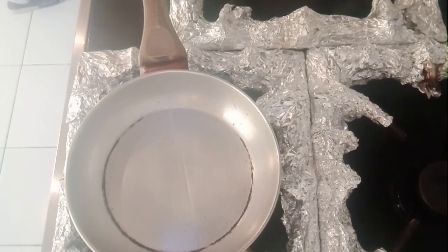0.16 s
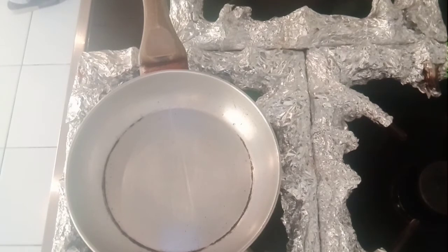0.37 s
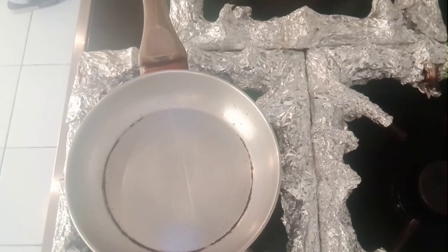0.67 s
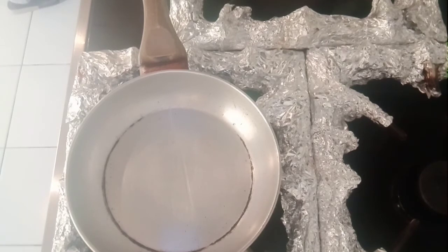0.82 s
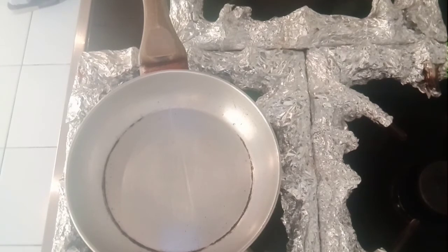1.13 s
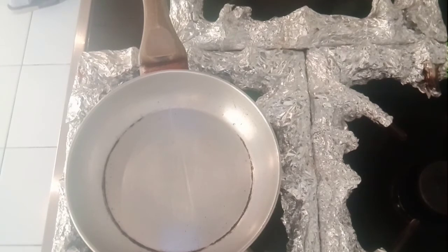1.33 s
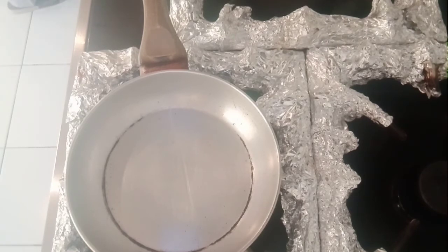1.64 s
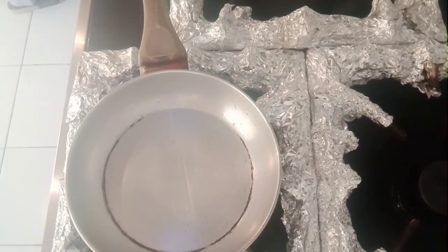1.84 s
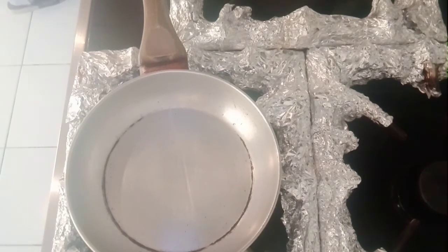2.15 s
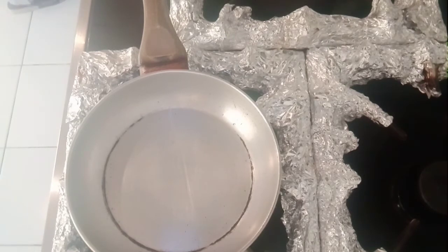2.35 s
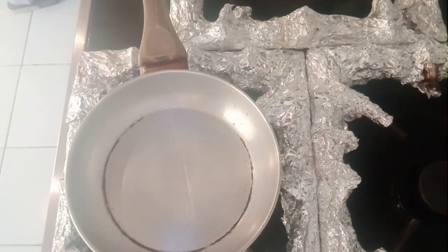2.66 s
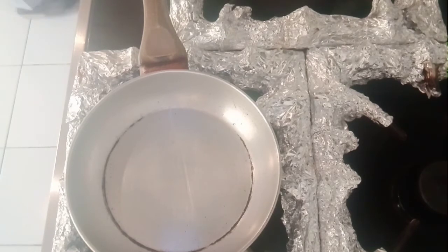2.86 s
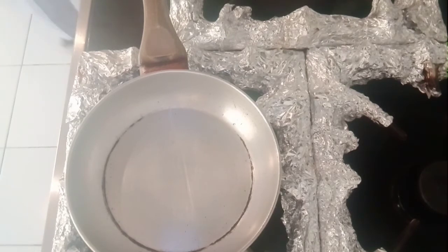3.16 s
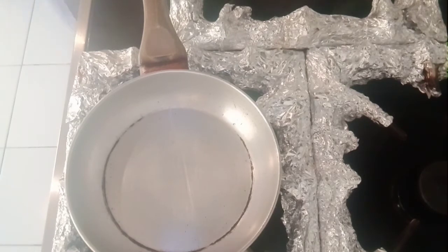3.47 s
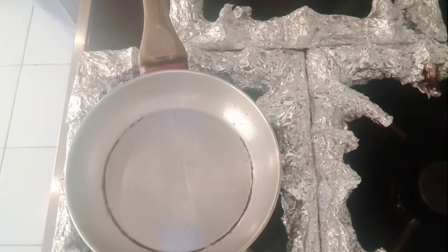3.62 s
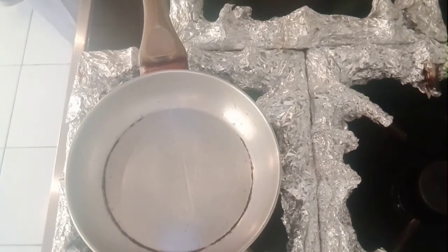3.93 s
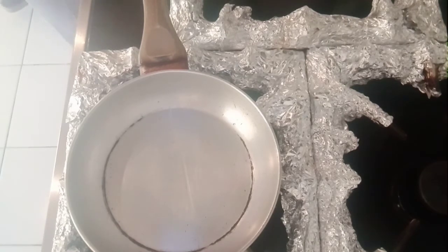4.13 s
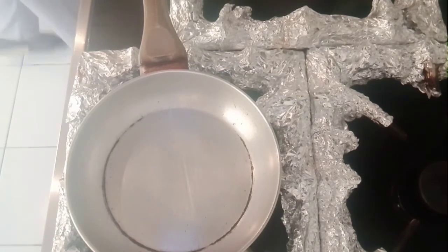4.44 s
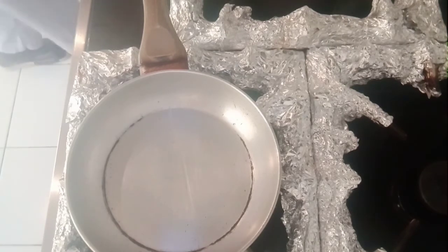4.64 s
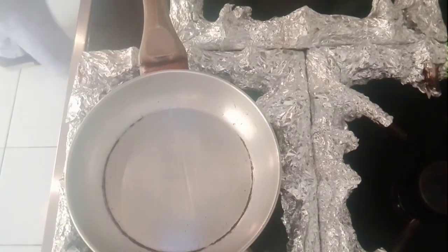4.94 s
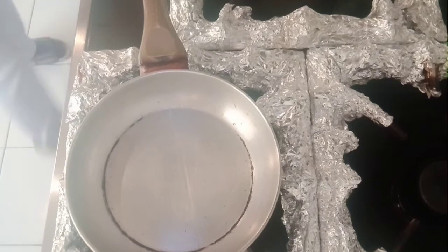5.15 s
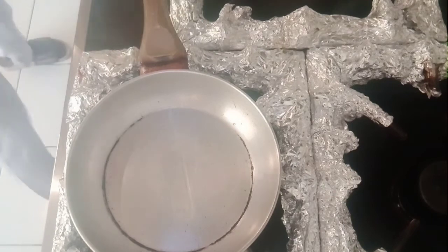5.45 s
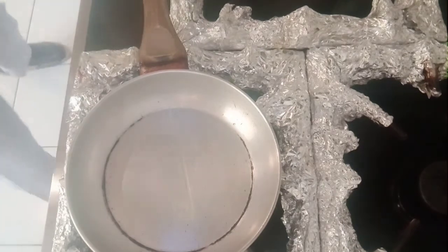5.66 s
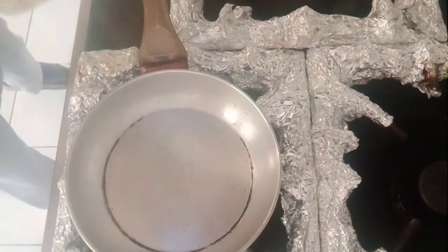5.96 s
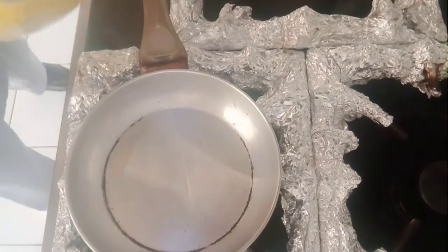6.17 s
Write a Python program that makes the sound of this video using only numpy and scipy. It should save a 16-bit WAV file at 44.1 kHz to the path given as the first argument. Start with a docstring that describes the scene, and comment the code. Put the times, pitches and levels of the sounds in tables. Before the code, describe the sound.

A small, hard tiled kitchen with a bright reverberation of just under a second, heard from above the stove. Low air noise and a very faint wavering mains hum run throughout, with faint dull bumps. From 0 to 2.8 seconds thin packaging is squeezed slightly away from the microphone: crackling rustles swell and ease, strongest around 0, 1.0, 1.3 and 2.1 to 2.4, with crisp snaps, thin squeaks and a few soft hollow knocks. At 2.87 a utensil hits a dish: one very loud, sharp, bright clink with a tiny rebound, ringing around 4 to 6 kilohertz and dying within about a second. Then it is quiet and sparse: a soft knock at 3.24, light scuffs from 3.6, a firmer hollow knock with a quick swish and dull shove at 3.9, small knocks at 4.2, 4.5 and 4.7, scuffs and ticks near 5.1, and a tick and knock at 5.6, ending around 6.3.

```python
"""A hard tiled kitchen, heard from above the stove, with mains hum and low air noise under it all.
First thin packaging rustles off to the side: crowds of noise impulses, with band-noise snaps and squeaks.
A utensil then lands on a dish with one sharp clink: filtered contact noise and slowly dying sines.
Last a container is handled: damped sine knocks, a few heard from the start, with scuffs and swishes of noise.
Faint dull bumps of low noise run throughout."""
import sys
import numpy as np
from scipy import signal
from scipy.fft import rfft, irfft
from scipy.io import wavfile
from scipy.ndimage import uniform_filter1d

SR = 44100
rng = np.random.default_rng(int(sys.argv[2]) if len(sys.argv) > 2 else 0)


def unload_audio(sound):
    """Save the sound as a 16-bit wav file, at the path given as the first command line argument."""
    columns = np.transpose(np.atleast_2d(sound))
    # keep every value between -1 and 1, then stretch to whole-number steps
    steps = np.round(np.clip(columns, -1, 1) * 32767)
    wavfile.write(sys.argv[1], SR, steps.astype(np.int16))


N = 277389
TIME = np.arange(N) / SR  # s

# Levels in the tables are relative: the mix gains, the room and the microphone act on them later.
# Hands squeeze the packaging:
# (time at the tightest [s], level [dB], 20 dB build-up [s], brightness [dB/octave])
SQUEEZES = [(0, -42, .02, -1), (.16, -45, .25, 0), (.28, -43.5, .2, 0), (.41, -47, .12, -.5),
            (.625, -46, 0.057, -.5), (.83, -51.5, 0.16, -2.5), (1.0, -40, .1, 0), (1.175, -45.5, .15, 0),
            (1.3, -39, 0.081, -0.5), (1.44, -47.5, .3, -2), (1.73, -54, .15, -2), (1.98, -48, .14, -3),
            (2.12, -42, 0.11, -3), (2.268, -38.5, 0.04, 4), (2.385, -42.5, .25, 1), (2.47, -53.5, .2, 2.5),
            (2.64, -54.5, .2, 4.5), (2.795, -44.5, .03, 1.5)]
# The bag slides over the worktop with a smooth swish: (time at the fastest [s], level [dB], 20 dB build-up [s],
# brightness [dB/octave])
SWISHES = [(3.68, -62.5, 0.058, 11.5), (3.893, -37.5, 0.14, 1.5), (3.98, -47, 0.14, 3), (4.74, -70, .1, 6),
           (5.1, -67, .6, 0.5), (5.7, -67, 0.54, 4)]
LET_GO_S = 0.1  # a squeeze or swish falls 20 dB in this time once the hands ease off
# Spectrum of the creasing film: (frequency [Hz], level [dB])
FILM_SPECTRUM = [(40, -19.5), (150, -6.5), (400, -4), (800, -0.5), (1600, 4.5), (3000, 3.5), (6000, 3.5),
                 (9000, 3.5), (15000, 1)]
# A crease snaps through: (time [s], level [dB], centre frequency [Hz], 17 dB decay [s])
SNAPS = [(0, -37, 7000, 0.014), (0.15, -30.5, 5850, 0.017), (.516, -48, 4070, 0.031),
         (0.782, -41.5, 5000, 0.007), (0.83, -41, 5000, 0.0093), (0.919, -37.5, 4640, 0.0062),
         (.944, -33.5, 5950, 0.0076), (0.981, -40, 7000, 0.0099), (1.155, -41.5, 2520, 0.0056),
         (1.716, -51.5, 1540, 0.016), (2.098, -33, 4600, 0.017), (2.254, -31, 5380, 0.031),
         (2.519, -42, 7300, 0.014), (2.608, -43.5, 5710, 0.025), (2.777, -41, 4470, .013)]
SNAP_OCTAVES = 2  # standard deviation of a snap's band
# Film drags over film with a thin squeak: (time [s], level [dB], pitch [Hz])
SQUEAKS = [(0, -44.5, 8280), (.146, -57.5, 1220), (0.769, -59, 1640), (1.156, -56, 2950),
           (1.29, -55.5, 1920), (1.781, -65, 1710), (1.87, -60, 1718), (1.962, -57, 3040),
           (2.24, -50, 1716)]
SQUEAK_OCTAVES, SQUEAK_S = .09, 0.18  # standard deviation of the band, 17 dB decay

# The utensil lands and settles: (time [s], level [dB])
CLINKS = [(2.8664, 6), (2.893, -25.5), (2.908, -9.5)]
# Spectrum of the hard contact: (frequency [Hz], level [dB])
CONTACT_SPECTRUM = [(40, -5), (100, -1), (200, 4.5), (250, 0), (320, 8.5), (500, 2), (1000, 6), (2000, 6),
                    (3900, 8), (6000, 8), (7500, 8), (9000, 9), (15000, -5.5)]
# Broad, well damped resonances of dish and utensil: (frequency [Hz], width [Hz], gain [dB])
BODY_RESONANCES = [(4266, 120, 9.5), (4990, 200, 5), (5490, 89, 8), (5820, 120, 3.5), (8460, 89, -12)]
# One midrange line at the resonance of microphone or room, then lightly damped modes of the dish:
# (frequency [Hz], level [dB], 60 dB decay [s])
RING_LINES = [(1262, -10, .6), (4305, 0, .9), (4328, 0, .8), (4359, -3, .75), (4399, -3, .7),
              (4617, -8, .55), (4957, -2, .6), (5149, -1, .6), (5208, -4, .6), (5315, -1, .7),
              (5440, -6, .5), (5775, -6, .45), (5866, -4, .5), (7090, -10, .5)]
RING_DB = -38.5  # gain on the ringing lines

# Hollow knocks of the container: (time [s], level [dB], pitch [Hz], 60 dB decay [s])
KNOCKS = [(.143, -32, 1140, 0.014), (.156, -36, 1230, 0.035), (1.07, -42.5, 503, 0.0083),
          (1.239, -38.5, 880, 0.0073), (1.506, -40.5, 700, 0.011), (1.74, -37.5, 850, 0.011),
          (2.123, -40, 686, 0.018), (3.24, -40, 594, 0.021), (3.935, -26.5, 492, 0.025),
          (3.972, -40, 171, 0.047), (4.19, -41, 1244, 0.016), (4.481, -36.5, 1187, 0.0098),
          (4.743, -35, 770, 0.0071), (5.614, -36.5, 1043, 0.023), (5.84, -45, 620, 0.015)]
# Spectrum of the dull thud in a knock: (frequency [Hz], level [dB])
THUD_SPECTRUM = [(50, -24.5), (140, 16), (220, -8.5), (400, 2), (700, 10.5), (1200, 6.5), (1750, 1.5),
                 (2300, -24), (5000, -35.5)]
# The container scuffs in the hand: (time [s], level [dB], centre frequency [Hz])
SCUFFS = [(3.566, -50.5, 804), (3.603, -52.5, 735), (3.707, -48.5, 453), (3.745, -49, 973),
          (4.11, -50, 556), (4.198, -61, 1450), (4.258, -52, 666), (4.349, -61, 508), (4.5, -65, 1400),
          (5.04, -47, 800), (5.124, -47.5, 802), (5.819, -55, 536)]
SCUFF_OCTAVES, SCUFF_S = 0.37, 0.053  # standard deviation of the band, 17 dB decay
# The container ticks and rattles:
# (time [s], level [dB], centre frequency [Hz], band standard deviation [octaves], 17 dB decay [s])
TICKS = [(3.885, -34, 8500, 0.98, 0.024), (4.674, -58, 1350, 0.74, 0.024), (4.718, -59, 5240, 0.35, 0.055),
         (4.967, -49.5, 1980, 0.57, 0.019), (5.067, -49.5, 1200, 1.1, 0.021),
         (5.096, -48, 1500, 1.8, 0.024), (5.124, -49.5, 1284, 1.4, 0.022),
         (5.167, -52.5, 7000, 0.46, 0.015), (5.174, -54, 2210, 0.57, 0.032), (5.283, -57, 4630, 1.5, 0.024),
         (5.567, -45, 6000, 2.2, 0.031), (5.569, -62, 3970, .08, 0.072), (5.873, -59.5, 4760, .15, 0.029)]

# Something heavier is pushed along: (time at the loudest [s], level [dB], 20 dB build-up [s])
SHOVES = [(.17, -54, 0.14), (2.16, -49.5, 0.13), (4.0, -47, 0.1), (4.52, -62, 0.04), (5.13, -57.5, 0.36)]
SHOVE_STOP_S = .27  # a shove falls 20 dB in this time
SHIFTING_DB = -62  # relative level of the light shifting in between
# Spectrum of the dull bumps: (frequency [Hz], level [dB])
BUMP_SPECTRUM = [(50, -4), (80, -4.5), (110, -12), (150, 4.5), (230, -5), (310, 8), (450, -1.5), (700, -2),
                 (1100, -6), (1700, -35.5), (4000, -28)]

# Spectrum of the low air noise: (frequency [Hz], level [dB])
AIR_SPECTRUM = [(30, -28), (75, 3.5), (150, -5.5), (240, -6.5), (500, -21), (900, -27.5), (2000, -18.5),
                (4000, -26.5), (15000, -18)]
# Lines of the mains hum: (frequency [Hz], level [dB])
HUM_LINES = [(100.2, -79), (150.5, -78.5), (200.6, -77), (301, -74)]

# Reverberation time of the tiled room: (frequency [Hz], 60 dB decay [s])
ROOM_T60 = [(100, 1), (400, 0.85), (1500, 0.89), (4000, 0.93), (6000, 0.8), (8000, 0.69), (11000, 0.45),
            (15000, 0.3)]
# Response of the microphone: (frequency [Hz], gain [dB])
MIC_RESPONSE = [(25, -14.5), (50, -7.5), (80, -1.5), (2000, -0.5), (6300, -1), (6620, -14), (7000, 1.5),
                (7800, 0.5), (9000, -11), (10500, -18.5), (13600, -24), (14800, -13), (15500, -8.5)]
# Narrow midrange resonance of the microphone: (frequency [Hz], width [Hz], gain [dB])
MIC_RESONANCE = (1255, 80, 8.2)
EDGE_HZ = 15560  # upper band limit


def rustle(moves, slide, patchy_db, per_s=1200, spread_db=4.5):
    """Buckling and friction: each move makes random crease impulses while the film slides over itself."""
    crease_db = spread_db * np.minimum(rng.exponential(1, N), 4)
    size = amp(crease_db) * rng.choice([-1, 1], N)
    buckling = unit(size * (rng.random(N) < per_s / SR))
    creases = buckling + slide * rng.standard_normal(N)
    hz, at, z = signal.stft(unit(colour(creases, FILM_SPECTRUM)), SR, nperseg=256)
    # each fold favours its own few pitches for a moment
    patches = smooth_field(z.shape, 4, 8)
    octaves = np.log2(np.clip(hz, 500, 12000) / 4000)[:, None]
    power = 0
    for s, db, build_s, tilt in moves:
        gain = swell(at, s, db, build_s, LET_GO_S) * amp(tilt * octaves)
        power = power + gain ** 2
    shaped = z * amp(patchy_db * patches) * np.sqrt(power)
    return signal.istft(shaped, SR, nperseg=256)[1][:N]


def creasing(snap_db=3.5, squeak_db=3.5):
    """Snap-through and friction: single creases give broad snaps, dragging film gives narrow squeaks."""
    snaps = bursts((s, db, hz, SNAP_OCTAVES, length) for s, db, hz, length in SNAPS)
    squeaks = bursts((s, db, hz, SQUEAK_OCTAVES, SQUEAK_S) for s, db, hz in SQUEAKS)
    return amp(snap_db) * snaps + amp(squeak_db) * squeaks


def clink(chatter_s):
    """Impact excitation: each hard contact chatters for milliseconds and shakes dish and utensil."""
    contact = np.zeros(N)
    for s, db in CLINKS:
        add(contact, s, amp(db) * scatter(chatter_s))
    crack = colour(contact, CONTACT_SPECTRUM)
    return crack + sum(resonance(crack, *row) for row in BODY_RESONANCES)


def ringing(ring_db):
    """Free vibration: the first blow leaves the dish's close, beating modes and one midrange line ringing."""
    out, t = np.zeros(N), TIME[:SR]
    first_blow_s = CLINKS[0][0]
    for hz, db, t60 in RING_LINES:
        envelope = amp(ring_db + db - 60 * t / t60)
        add(out, first_blow_s, envelope * np.sin(2 * np.pi * (hz * t + rng.random())))
    return out


def knocks(rise=0.00042, thud_db=16, thud_s=0.024, reach=1.63, size=4096):
    """Damped resonance: each soft blow gives a dull thud and rings one hollow tone for a few cycles."""
    out, t = np.zeros(N), TIME[:size]
    for s, db, hz, t60 in KNOCKS:
        envelope = amp(-60 * t / t60) * (1 - np.exp(-t / rise))
        tone = envelope * np.sin(2 * np.pi * hz * t)
        blow = tone + amp(thud_db) * colour(scatter(thud_s), THUD_SPECTRUM)
        # a lower blow carries less treble: the cutoff is reach times the pitch
        lowpass = signal.butter(4, reach * hz, fs=SR, output="sos")
        add(out, s, amp(db) * signal.sosfilt(lowpass, blow))
    return out


def handling(scuff_db=-3.5, tick_db=-1.5):
    """Sliding friction and light impact: the container turns in the hand with dull scuffs and short ticks."""
    scuffs = bursts((s, db, hz, SCUFF_OCTAVES, SCUFF_S) for s, db, hz in SCUFFS)
    return amp(scuff_db) * scuffs + amp(tick_db) * bursts(TICKS)


def shifting(lumpy_db):
    """Irregular friction: faint dull bumps come and go at changing low pitches and swell with each shove."""
    noise = colour(rng.standard_normal(N), BUMP_SPECTRUM)
    z = signal.stft(noise, SR, nperseg=1024, noverlap=768)[2]
    lumps = np.minimum(smooth_field(z.shape, 4, 9), 2)
    bumps = signal.istft(z * amp(lumpy_db * lumps), SR, nperseg=1024, noverlap=768)[1][:N]
    shove_power = sum(swell(TIME, *row, SHOVE_STOP_S) ** 2 for row in SHOVES)
    return unit(bumps) * np.sqrt(amp(SHIFTING_DB) ** 2 + shove_power)


def background(air_db=-66, waver=0.93):
    """Stationary noise and line spectrum: low air noise, and a mains hum whose lines waver in level."""
    out = amp(air_db) * unit(colour(rng.standard_normal(N), AIR_SPECTRUM))
    for hz, db in HUM_LINES:
        drift = unit(signal.resample(rng.standard_normal(size=60), N))
        line = np.sqrt(2) * np.sin(2 * np.pi * (hz * TIME + rng.random()))
        out += amp(db) * (1 + waver * drift) * line
    return out


def kitchen(x, wet_db, near_s, build=0.0013):
    """Reverberation: direct sound scattered by stove and worktop, then the long tail of tiled walls."""
    t = TIME[:round(1.3 * SR)]
    hz, at, z = signal.stft(rng.standard_normal(len(t)), SR, nperseg=256)
    decay = amp(-60 * at / read(ROOM_T60, hz)[:, None])
    tail = signal.istft(z * decay, SR, nperseg=256)[1][:len(t)]
    tail *= 1 - np.exp(-t / build)
    response = amp(wet_db) * tail / np.linalg.norm(tail)
    add(response, 0, scatter(near_s))
    return signal.fftconvolve(x, response / np.linalg.norm(response))[:N]


def scatter(length, size=4096):
    """Diffuse scattering: a noise burst of nearly even spectrum and unit energy, dying over length seconds."""
    z = rfft(rng.standard_normal(size) * np.exp(-TIME[:size] / length))
    burst = np.roll(irfft(z / abs(z)), 12)  # keep the phase only, with a short delay
    return burst * np.exp(-TIME[:size] / (10 * length))


def resonance(x, hz, width_hz, db):
    """Resonance: a single damped mode passes a band of x around hz."""
    return amp(db) * signal.lfilter(*signal.iirpeak(hz, hz / width_hz, SR), x)


def bursts(rows, size=8192):
    """Band noise with exponential decay: short runs of cracks or slips, each in its own band."""
    out, t, hz = np.zeros(N), TIME[:size], np.fft.rfftfreq(size, 1 / SR)
    for s, db, centre_hz, width, length in rows:
        band = np.exp(-.5 * (np.log2((hz + 1) / centre_hz) / width) ** 2)
        burst = unit(irfft(rfft(rng.standard_normal(size)) * band))
        add(out, s, amp(db) * burst * np.exp(-2 * t / length))
    return out


def swell(t, s, db, build_s, release_s):
    """Exponential envelope: climbs 20 dB in build_s up to time s, then falls 20 dB in release_s."""
    return amp(db - 20 * np.maximum((s - t) / build_s, (t - s) / release_s))


def smooth_field(shape, bins, frames):
    """Local correlation: random values averaged over neighbouring bins and frames, at rms 1."""
    field = uniform_filter1d(rng.standard_normal(shape), size=bins, axis=0)
    return unit(uniform_filter1d(field, size=frames, axis=1))


def colour(x, points, size=4096):
    """Minimum phase: a causal filter with the given spectrum, so that attacks stay sharp."""
    log_gain = np.log(amp(read(points, abs(np.fft.fftfreq(size, 1 / SR)))))
    taps = np.fft.ifft(np.exp(np.conj(signal.hilbert(log_gain)))).real
    return signal.oaconvolve(x, taps[:size // 2])[:len(x)]


def read(points, hz):
    """Logarithmic pitch scale: interpolates a spectrum on a log-frequency axis."""
    f, value = np.transpose(points)
    return np.interp(np.log(hz + 1), np.log(f + 1), value)


def amp(db):
    """Decibel law: level to amplitude gain."""
    return 10 ** (np.asarray(db) / 20)


def unit(x):
    """Mean power: scales to rms 1."""
    return x / np.sqrt(np.mean(x ** 2) + 1e-20)


def add(mix, s, sound):
    """Superposition: mixes a sound in at time s."""
    part = mix[max(round(s * SR), 0):][:len(sound)]
    part += sound[:len(part)]


def scene():
    """Superposition: packaging far in the room, container nearer, the clink, shifting and background."""
    packaging = amp(1.0) * rustle(SQUEEZES, slide=.6, patchy_db=3.5) + creasing()
    swishes = amp(1.5) * rustle(SWISHES, slide=2.6, patchy_db=2.0)
    container = amp(3.0) * knocks() + handling() + swishes
    far = kitchen(packaging, wet_db=-1.5, near_s=0.004)
    near = kitchen(container, wet_db=-7.5, near_s=0.0025)
    struck = kitchen(clink(chatter_s=0.0034), wet_db=3.5, near_s=0.00041, build=0.017)
    strike = struck + ringing(RING_DB)
    return (far + near + strike + amp(-2.0) * shifting(lumpy_db=6.5) + background())[None]


def record(dry):
    """Linear filtering: the microphone adds a midrange resonance and uneven treble; then the band limit."""
    x = dry[0] + resonance(dry[0], *MIC_RESONANCE)
    edge = signal.firwin(801, EDGE_HZ, window=("kaiser", 9), fs=SR)
    return signal.oaconvolve(colour(x, MIC_RESPONSE), edge, "same")[None]


dry = scene()
out = record(dry)
unload_audio(out)
```